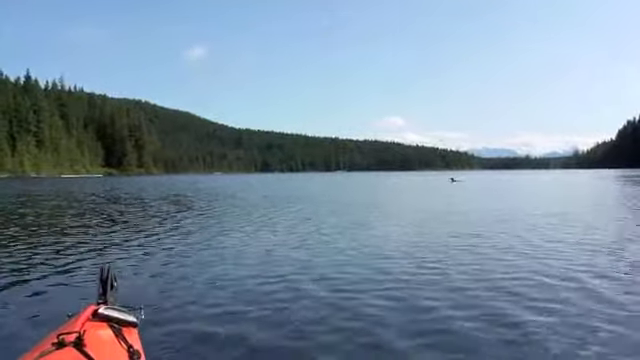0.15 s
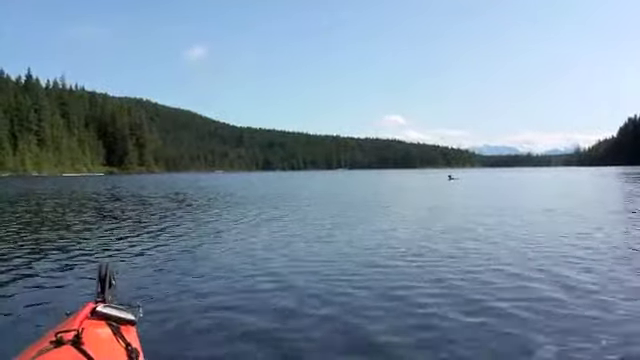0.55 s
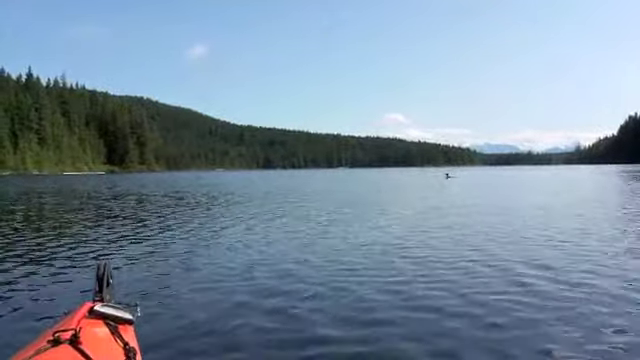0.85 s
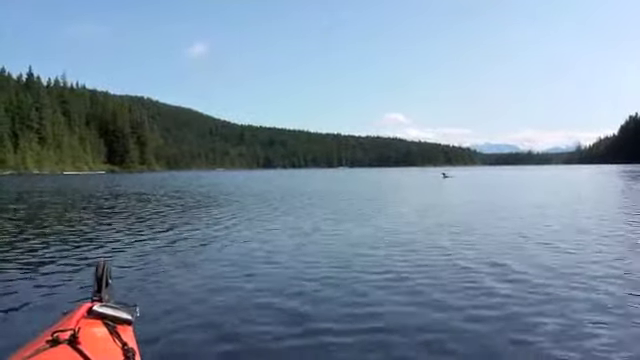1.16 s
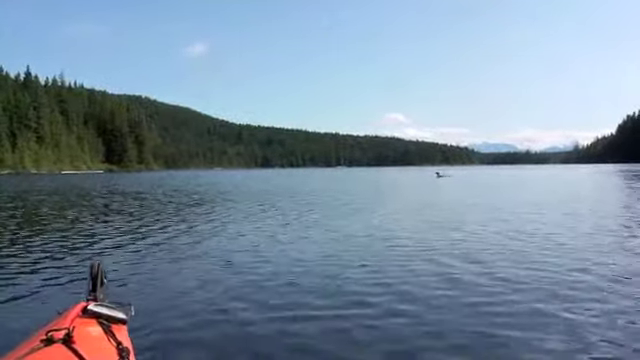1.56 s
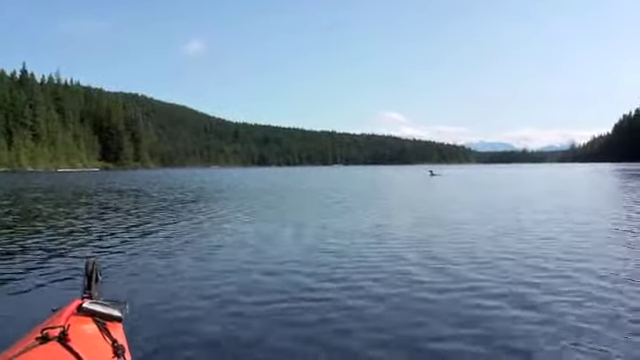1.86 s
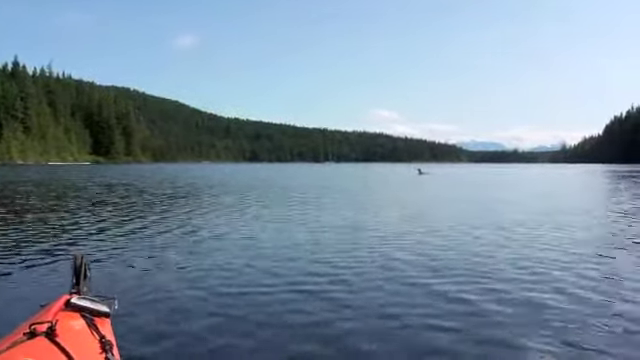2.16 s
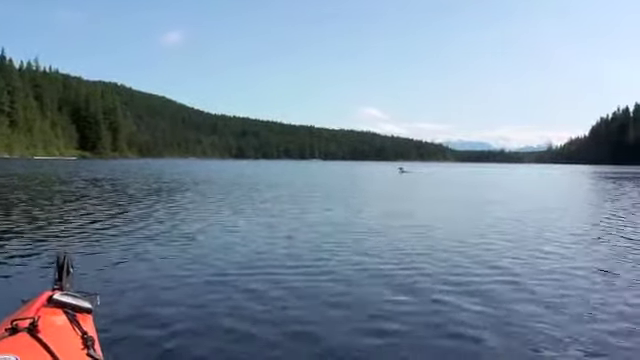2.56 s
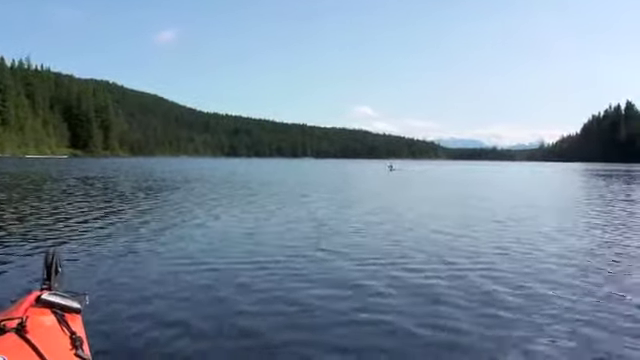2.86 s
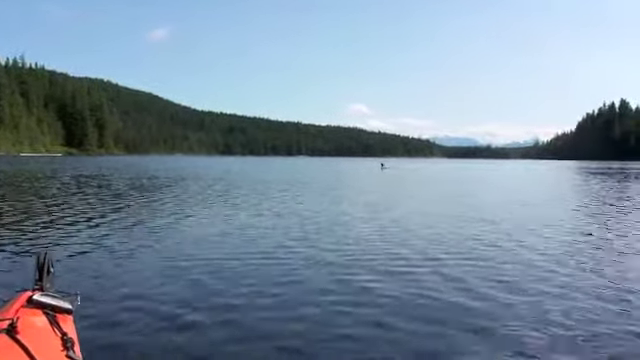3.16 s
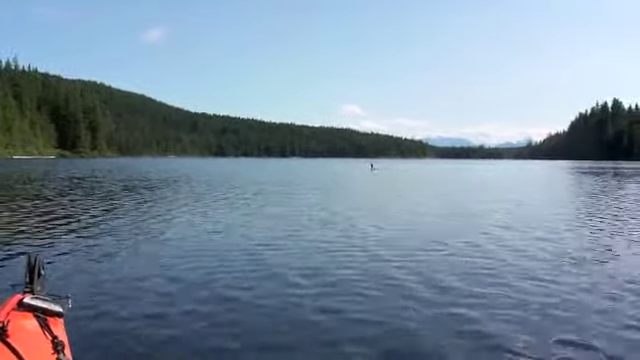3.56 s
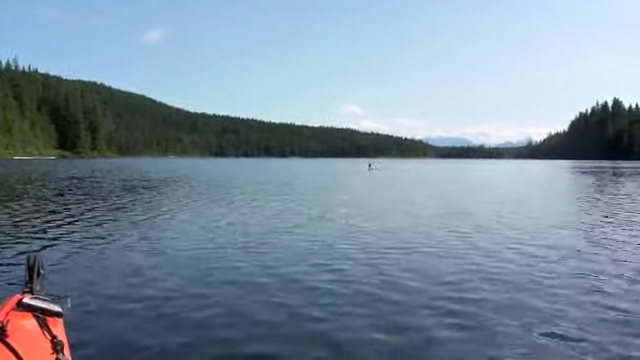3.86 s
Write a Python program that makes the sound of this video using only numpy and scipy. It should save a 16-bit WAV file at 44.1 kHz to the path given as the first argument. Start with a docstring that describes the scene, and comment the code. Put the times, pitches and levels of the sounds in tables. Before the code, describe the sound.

A loon gives a warbling call over a quiet lake after faint camera whirring.

```python
"""A calm lake: a soft wash of air and water, with a camera's hiss, thin whine and faint electrical buzz.
From 0.75 s the camera ticks twice and its motor whirrs up and down; the buzz pauses meanwhile.
At 3.05 s, as the motor stops, a loon calls, its overtones shaped by its throat: a short low note
breaks up into a dying warble, drops back, and a long low note begins.
A quick reflection comes from close by; the forested shore's smeared echo follows under the last notes."""
import sys
import numpy as np
from scipy import signal
from scipy.fft import rfft, irfft
from scipy.io import wavfile
from scipy.ndimage import uniform_filter1d

SR = 44100
rng = np.random.default_rng(int(sys.argv[2]) if len(sys.argv) > 2 else 0)


def int16_out(signal):
    """Quantize to a 16-bit WAV file."""
    q = np.round(np.clip(np.atleast_2d(signal).T, -1, 1) * 32767)
    wavfile.write(sys.argv[1], SR, q.astype(np.int16))


N = 176400


def undb(db):
    """Decibels to gain."""
    return 10 ** (np.asarray(db) / 20)


def level(x, db):
    """Scale to an rms level."""
    return x * undb(db) / np.sqrt(np.mean(x ** 2))


def pan(db):
    """Stereo gains for a left-minus-right level."""
    return undb(np.array([[1], [-1]]) * db / 2)


def lookup(table, hz):
    """Interpolate on a log-frequency axis."""
    table_hz, values = np.array(table).T
    return np.interp(np.log(hz + 1), np.log(table_hz), values)


def glide(t, times, values):
    """Cosine ease between turning points."""
    index = np.arange(len(times))
    place = np.interp(t, times, index)
    eased = np.floor(place) + (1 - np.cos(np.pi * (place % 1))) / 2
    return np.interp(eased, index, values)


def gate(t, start_s, end_s, attack_s=.012, release_s=.01):
    """Linear attack, hold, linear release."""
    return np.clip((t - start_s) / attack_s, 0, 1) * np.clip((end_s - t) / release_s, 0, 1)


def wander(rate_hz):
    """Smooth random curve, unit rms."""
    hold = int(SR / rate_hz)
    steps = np.repeat(rng.standard_normal(N // hold + 1), hold)
    return level(uniform_filter1d(steps, hold)[:N], 0)


def resonate(x, hz, width_hz):
    """One resonance, applied twice for steep skirts."""
    b, a = signal.iirpeak(hz, hz / width_hz, fs=SR)
    return signal.lfilter(b, a, signal.lfilter(b, a, x))


def stereo_noise(correlation):
    """Partly correlated white noise pair."""
    mid, side = rng.standard_normal((2, N))
    return np.sqrt(1 + correlation) * mid + np.sqrt(1 - correlation) * side * np.array([[1], [-1]])


def wash(spectrum, correlation):
    """Stereo noise shaped to a spectrum."""
    hz = np.arange(N // 2 + 1) * SR / N
    inside = (hz > spectrum[0][0]) & (hz < spectrum[-1][0])
    return irfft(rfft(stereo_noise(correlation)) * undb(lookup(spectrum, hz)) * inside, N)


# air and water spectrum: f/Hz, relative level/dB
LAKE_SPECTRUM = [(30, -29), (42, -21.5), (57, -14), (70, -19), (110, -10.5), (206, -2), (350, -2),
                 (600, -2), (1000, -5), (2120, -9), (2720, -22), (3000, -40.5)]

def lake():
    """Air and ripples: a faint, nearly even wash."""
    flicker_db = .53 * wander(13)
    return level(wash(LAKE_SPECTRUM, correlation=.033) * undb(flicker_db), -56) * pan(1.2)


# hiss spectrum: f/Hz, relative level/dB
HISS_SPECTRUM = [(2900, -31.5), (3400, -5.5), (4000, -22.5), (4500, -5), (5000, -18), (5400, -1.5),
                 (6500, 1.5), (7200, -1.5), (8200, 0), (9500, -3), (11000, -14), (11500, -31.5)]

def camera_hiss():
    """Steady treble noise."""
    return level(wash(HISS_SPECTRUM, correlation=.1), -67.5) * pan(2.5)


# steady tones: f/Hz, level/dB
WHINE_TONES = [(7852, -75), (7882, -84)]

def camera_whine(t):
    """Two thin, close tones, beating."""
    return sum(level(np.sin(2 * np.pi * hz * t), db) for hz, db in WHINE_TONES)


# ticks: t/s, onset level/dB, centre f/Hz
CAMERA_TICKS = [(0.7474, -49, 6800), (1.852, -49.5, 1390)]

def camera_ticks(t, decay_s=.0017):
    """Small ticks: fast-decaying bursts of resonant noise."""
    out = np.zeros(N)
    for start_s, db, hz in CAMERA_TICKS:
        ring = level(resonate(rng.standard_normal(N), hz, hz / 2), db)
        out += ring * (t > start_s) * np.exp(-np.abs(t - start_s) / decay_s)
    return out


# motor whistle turning points: t/s, centre f/Hz
MOTOR_PATH = [(0.758, 8400), (0.787, 8150), (0.874, 9520), (0.894, 8640), (0.943, 9510), (0.961, 8430),
              (1.062, 8340), (1.077, 9070), (1.12, 8140), (1.144, 9350), (1.254, 8500), (1.315, 9780),
              (1.399, 8790), (1.486, 8260), (1.556, 9700), (1.593, 9470), (1.622, 8160), (1.701, 9440),
              (1.727, 8430), (1.768, 8160), (1.805, 9620), (1.948, 9930), (1.956, 8700), (1.977, 9900),
              (2.011, 9390), (2.052, 8040), (2.096, 8950), (2.154, 9410), (2.174, 8180), (2.218, 9340),
              (2.258, 7870), (2.305, 9420), (2.354, 8310), (2.444, 9390), (2.473, 8200), (2.531, 8100),
              (2.566, 9470), (2.679, 9300), (2.694, 8270), (2.731, 8970), (2.76, 8580), (2.798, 9230),
              (2.847, 8100), (2.894, 9310), (3.013, 9520), (3.08, 7680)]

def motor_whirr(t, width_hz=430, correlation=.61):
    """A small motor hunts up and down: narrow whistle plus rustle, both coloured by the casing."""
    times, hz = np.array(MOTOR_PATH).T
    carrier = np.cos(2 * np.pi * np.cumsum(glide(t, times, hz)) / SR)
    narrow = signal.butter(2, width_hz / 2, fs=SR, output="sos")
    casing = signal.butter(3, [7430, 9800], "band", fs=SR, output="sos")
    whistle = signal.sosfilt(casing, carrier * signal.sosfilt(narrow, stereo_noise(correlation)))
    rustle = signal.sosfilt(casing, stereo_noise(correlation))
    return (level(whistle, -66.5) + level(rustle, -69.5)) * gate(t, times[0], times[-1])


def electrical_buzz(t, rate_hz=59.94, first_s=.014, decay_s=.0011, scatter_db=2.5):
    """Evenly spaced, unevenly strong electrical ticks, muted while the motor runs."""
    cycle = (t - first_s) * rate_hz + 1
    tick_db = scatter_db * np.minimum(rng.standard_normal(int(cycle[-1]) + 1), 1)
    envelope = undb(tick_db)[cycle.astype(int)] * np.exp(-(cycle % 1) / rate_hz / decay_s)
    ticks = resonate(rng.standard_normal(N) * envelope, hz=6400, width_hz=3100)
    resting = 1 - gate(t, MOTOR_PATH[0][0], MOTOR_PATH[-1][0])
    return level(ticks, -74) * resting * pan(2.5)


# reflections, near to far: delay t/s, decay t/s, relative level/dB
CALL_REFLECTIONS = [(0.02, 0.014, -32), (0.051, .15, -41.5), (0.418, .15, -41), (.585, .06, -33),
                    (0.648, .12, -26.5)]

def call_echoes(t, call):
    """A quick reflection off nearby water or a boat, then late, dull echoes from the wooded shore."""
    response = np.zeros((2, N))
    for delay_s, decay_s, db in CALL_REFLECTIONS:
        tail = (t > delay_s) * np.exp(-np.abs(t - delay_s) / decay_s)
        response += level(rng.standard_normal((2, N)) * tail, db) / np.sqrt(N)
    dull = resonate(call.mean(axis=0), hz=1150, width_hz=2000)
    return signal.fftconvolve(dull[None], response, axes=1)[:, :N]


def treble(hz, corner_hz=3150):
    """Weight: 0 for low overtones, 1 for the top ones."""
    return 1 / (1 + (corner_hz / hz) ** 20)


# loon's stereo balance: f/Hz, left-minus-right level/dB
LOON_PAN = [(620, 3), (760, 3.5), (880, 5.5), (1000, 2), (1110, -0.1), (1280, 6.5), (1500, 7), (1750, 8.5),
            (2100, 16.5), (2300, 9), (2600, 8.5), (3300, 5), (4400, 3), (5600, 9.5)]

def loon_voice(hz, db, envelope, throat_db, harmonics, jitter=.001, shimmer_db=.52, rasp_db=3.5):
    """Slightly unsteady tone; overtones follow throat_db(f, level) and the top ones rasp."""
    on = envelope > 0
    hz = (hz * (1 + jitter * wander(120)))[on]
    db = (db + shimmer_db * wander(140))[on]
    lag_s = np.array([[0], [.00004]])
    phase = 2 * np.pi * (np.cumsum(hz) / SR - hz * lag_s)
    out = np.zeros((2, N))
    for k in range(1, harmonics + 1):
        colour_db = throat_db(k * hz, db) if k > 1 else 0
        flutter_db = rasp_db * wander(200)[on] * treble(k * hz)
        amplitude = np.sqrt(2) * undb(db + colour_db + flutter_db)
        out[:, on] += amplitude * pan(lookup(LOON_PAN, k * hz)) * np.sin(k * phase)
    return out * envelope


# low-register overtones: f/Hz, level/dB re fundamental
LOW_OVERTONES = [(1190, -16.5), (1290, -16.5), (1400, -1), (1520, 3.5), (1850, -33.5), (1950, -38),
                 (2100, -23), (2290, -21.5), (2500, -44.5), (3000, -56), (3800, -47.5), (4550, -33.5),
                 (5300, -45), (6100, -32.5), (6850, -38), (7600, -31.5), (10000, -44.5)]

def loon_note(t, note, treble_db=-26, arched=False):
    """One note through the low-register throat, purer as it weakens; arched = parabolic contours."""
    times, points_hz, points_db = np.array(note).T

    def contour(points):
        if arched:
            return np.polyval(np.polyfit(times, points, 2), np.clip(t, times[0], times[-1]))
        return np.interp(t, times, points)

    def throat_db(hz, voice_db):
        return lookup(LOW_OVERTONES, hz) + voice_db - points_db.max() + treble_db * treble(hz)

    envelope = gate(t, times[0], times[-1])
    return loon_voice(contour(points_hz), contour(points_db), envelope, throat_db, harmonics=12)


# high-register overtones: f/Hz, level/dB re fundamental
HIGH_OVERTONES = [(1670, -33.5), (1750, -24.5), (1900, -30), (2100, -22.5), (2230, -24.5), (2550, -37),
                  (2630, -31.5), (2850, -42.5), (3050, -48), (3400, -50.5), (3900, -49), (4450, -40),
                  (5100, -48), (5600, -42), (6200, -39.5), (6700, -37), (7300, -50), (7800, -43),
                  (10000, -54)]
# warble turning points: t/s, f/Hz
WARBLE_TURNS = [(3.128, 896), (3.143, 926), (3.189, 1116), (3.247, 871.5), (3.297, 1050), (3.348, 857),
                (3.398, 904), (3.433, 860.5), (3.466, 877.5), (3.499, 854), (3.548, 852), (3.613, 837)]

def loon_warble(t, db_per_octave=27, treble_db_per_db=1.8):
    """The voice breaks upward into shrinking swings, louder and brighter with pitch."""
    times, turns_hz = np.array(WARBLE_TURNS).T
    pitch_hz = glide(t, times, turns_hz)
    db = -27 + db_per_octave * np.log2(pitch_hz / 874)

    def throat_db(hz, voice_db):
        return lookup(HIGH_OVERTONES, hz) + treble_db_per_db * (voice_db - db.max()) * treble(hz)

    envelope = gate(t, times[0], times[-1], attack_s=.02, release_s=.038)
    return loon_voice(pitch_hz, db, envelope, throat_db, harmonics=9)


# note contours: t/s, f/Hz, level/dB
OPENING_NOTE = [(3.048, 652, -34), (3.09, 759.5, -28), (3.14, 686, -42)]
BREAK_SQUEAK = [(3.127, 1160, -46.5), (3.16, 1153, -42.5)]
FALLING_NOTE = [(3.596, 638, -31.5), (3.645, 617, -36), (3.705, 598, -43), (3.766, 585, -59)]
WAIL_NOTE = [(3.845, 611.5, -35), (3.885, 632.8, -30), (3.95, 643.7, -29), (4.03, 653.3, -30)]

def loon_call(t):
    """Bright low note, squeak at the voice break, warble, falling note, start of a wail."""
    call = loon_note(t, OPENING_NOTE, treble_db=0, arched=True) + loon_warble(t)
    return call + sum(loon_note(t, note) for note in (BREAK_SQUEAK, FALLING_NOTE, WAIL_NOTE))


def scene():
    """Loon, echoes and lake, with the camera close by."""
    t = np.arange(N) / SR
    call = loon_call(t)
    outdoors = call + call_echoes(t, call) + lake()
    mechanism = (motor_whirr(t) + camera_whine(t) + camera_ticks(t)) * pan(8)
    return outdoors + mechanism + camera_hiss() + electrical_buzz(t)


def record(dry):
    """Steep low-pass at 11 kHz."""
    return signal.sosfilt(signal.ellip(8, .2, 70, 11000, fs=SR, output="sos"), dry)


dry = scene()
out = record(dry)
int16_out(out)
```